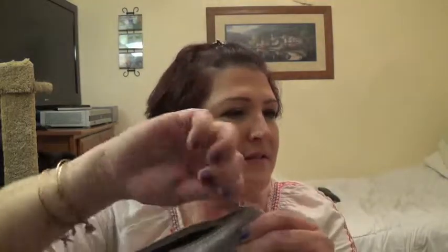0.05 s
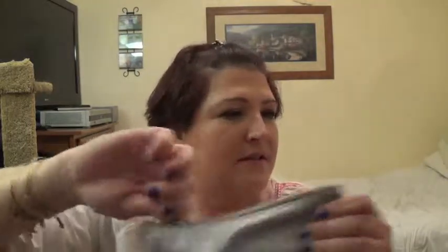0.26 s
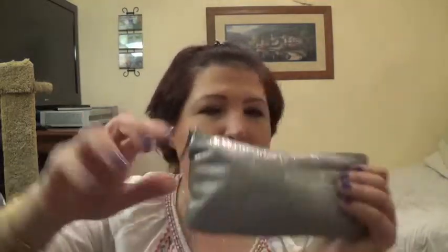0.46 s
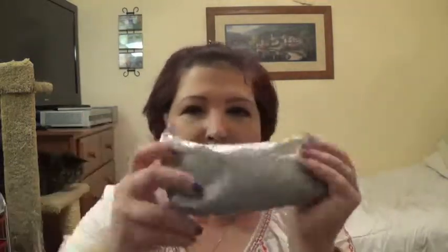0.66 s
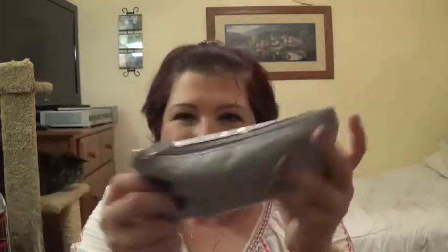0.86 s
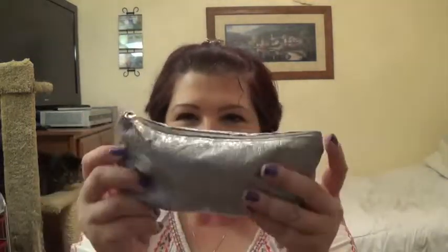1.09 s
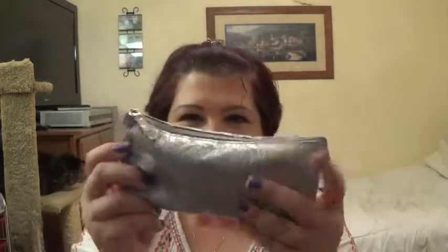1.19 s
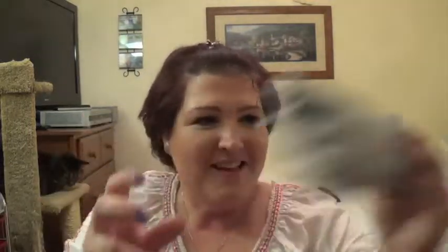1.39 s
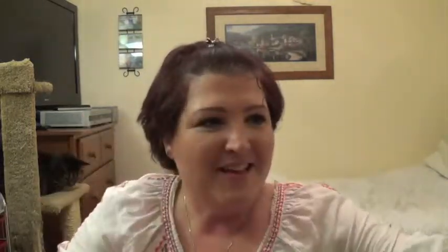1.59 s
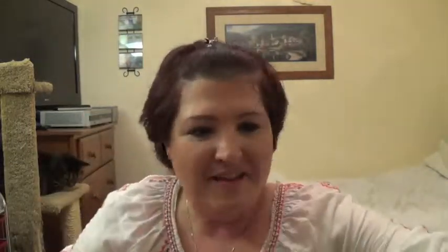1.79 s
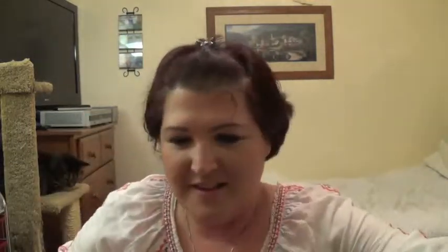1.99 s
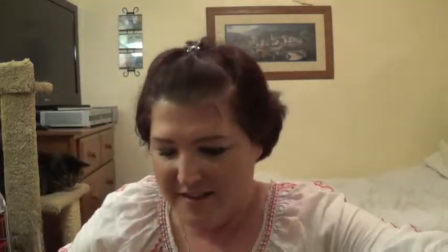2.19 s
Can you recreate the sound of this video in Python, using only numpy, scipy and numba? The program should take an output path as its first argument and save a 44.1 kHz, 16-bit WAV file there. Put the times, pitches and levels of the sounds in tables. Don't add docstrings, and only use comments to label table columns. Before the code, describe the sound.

A foil-like pouch gives a sharp snap at 0.1 s, then its zip buzzes shut from 0.17 to 0.42 s, rising in pitch. Bright crinkles and crackling pops follow from 0.6 to 1.25 s, with a stronger rustle as it is laid aside around 1.3-1.5 s. At 1.9 s a heavier item knocks and bounces on a wooden table, rattling loose things. Close, quiet room with faint hum and whine.

```python
import sys
import numpy as np
from scipy import signal
from scipy.fft import rfft, irfft
from scipy.io import wavfile
from scipy.ndimage import uniform_filter1d
from numba import njit

SR = 44100
rng = np.random.default_rng(int(sys.argv[2]) if len(sys.argv) > 2 else 0)


def invert_db(level):
    return 10 ** (np.asarray(level, dtype=float) / 20)


def store_wav(level_fs):
    pcm = np.round(np.clip(np.atleast_2d(level_fs), -1, 1) * 32767)
    wavfile.write(sys.argv[1], SR, pcm.T.astype(np.int16))


N = 99225
T = np.arange(N) / SR
WALL_TOP_HZ = 4270


def unit(x):
    return x / np.sqrt(np.mean(x ** 2))


def noise():
    return rng.standard_normal(N)


def colour(x, points):
    hz, db = np.array(points, float).T
    log_f = np.log(np.arange(1025) * SR / 2048 + 1)
    log_gain = np.interp(log_f, np.log(hz), db) * np.log(10) / 20
    cepstrum = irfft(log_gain)
    cepstrum = cepstrum * np.r_[1, 2 * np.ones(1023), 1, np.zeros(1023)]
    response = irfft(np.exp(rfft(cepstrum)))
    return unit(signal.fftconvolve(x, response)[:len(x)])


def band(x, lo_hz, hi_hz):
    sos = signal.butter(2, [lo_hz, min(hi_hz, .45 * SR)], "bandpass", fs=SR, output="sos")
    return signal.sosfilt(sos, x)


def walk(rate):
    k = int(SR / rate)
    steps = np.repeat(rng.standard_normal(N // k + 1), k)
    return 1.44 * uniform_filter1d(uniform_filter1d(steps, k), k)[:N]


@njit
def rings(start, hz, t60, size, n, sr):
    y = np.zeros(n)
    for k in range(len(start)):
        turn = np.exp(2j * np.pi * hz[k] / sr - np.log(1000) / (t60[k] * sr))
        z = size[k] + 0j
        for i in range(int(start[k] * sr), min(n, int((start[k] + t60[k]) * sr))):
            y[i] += z.imag
            z *= turn
    return y


def bursts(start, t60, size):
    total = 0
    for s, g in zip(start, size):
        age = np.maximum(T - s, 0)
        total = total + g * 1000. ** (-age / t60) * np.minimum(age / 0.0021, 1)
    return total


def room_tone():
    # (f/Hz, level/dB)
    air_colour = [(25, -5), (131, 1.5), (979, -5.5), (1510, -22), (3910, -16), (11000, -26), (15200, -8.5),
                  (16500, -7.5)]
    middle = colour(noise(), air_colour)
    side = 0.23 * band(colour(noise(), air_colour), 20, WALL_TOP_HZ / 2)
    air = invert_db(-55) * (middle + side * np.array([[1], [-1]]))
    fan_hz, fan_width_hz = 1660, 160
    fan = unit(band(noise(), fan_hz - fan_width_hz / 2, fan_hz + fan_width_hz / 2))
    fan = fan * invert_db(-59 + 2 * walk(9.25))
    hum = invert_db(-59.5 + 2 * walk(9.97)) * np.sin(2 * np.pi * 117.3 * T)
    whine = invert_db(-65) * np.sin(2 * np.pi * 15735 * T)
    rumble = 0
    for f, db in [(55, -60.5), (250, -57)]:
        rumble = rumble + unit(band(noise(), f * .6, f * 1.5)) * invert_db(db + 3 * walk(25))
    rumble = rumble * np.exp(-((T - 1.372) / 0.15) ** 4)
    return air + fan + hum + whine + rumble


def walls(x):
    t60_s, level_db, wide = 0.24, -15, 0.65
    t = T[:SR // 2]
    dull = signal.butter(1, [200, WALL_TOP_HZ], "bandpass", fs=SR, output="sos")
    echoes = rng.standard_normal((2, len(t))) * (t > .004) * 1000. ** (-t / t60_s)
    mid, side = signal.sosfilt(dull, echoes)
    side = wide * band(side, 100, WALL_TOP_HZ / 2)
    tails = np.array([mid + side, mid - side]) / np.sqrt(np.sum(mid ** 2))
    return invert_db(level_db) * signal.fftconvolve(x, tails, axes=1)[:, :N]


def phase_apart(x, lead, top_hz):
    both_ways = band(band(x, 150, top_hz)[::-1], 150, top_hz)[::-1]
    return x - lead * np.array([[1], [-1]]) * signal.hilbert(both_ways).imag


def drop():
    # (t/s, peak level/dB, clatter level/dB)
    knocks = [(1.8943, -9, 3.5), (1.8968, -5, -5), (1.9061, -10.5, 4), (1.913, -21, -8), (1.9245, -11, 3.5),
              (1.9305, -10, -11), (1.9435, -18, -4), (1.9567, -13.5, -5), (1.9725, -21, -4),
              (1.998, -23, -3.5), (2.038, -12, -6.5)]
    # (f/Hz, level/dB, t60/s)
    table_tones = [(101, -28, 0.09), (170, -13, 0.083), (240, -11, 0.025), (386, -1.5, 0.026),
                   (574, 4, 0.02), (775, 10, 0.023), (1010, 5, 0.025)]
    # (f/Hz, level/dB)
    clatter_colour = [(35, -38), (60, -5.5), (559, 1.5), (691, -5), (1130, -6), (7960, -17.5), (13000, -25),
                      (16500, -53)]
    s, db, bright_db = np.array(knocks, float).T
    u = rng.standard_normal((len(s), 2 * len(table_tones))).T
    wood = 0
    for k, (f, g, t60) in enumerate(table_tones):
        hz = f * (1 + 0.06 * u[2 * k])
        wood = wood + rings(s, hz, t60 + 0 * s, invert_db(db + g + 2.5 * u[2 * k + 1]), N, 1. * SR)
    clatter = colour(noise() * invert_db(1.3 * walk(180)), clatter_colour)
    clatter = clatter * bursts(s, 0.14, invert_db(db + bright_db))
    return invert_db(-21.5) * band(wood, 63, 3500) + invert_db(-14) * clatter


def crinkle():
    # (t/s, effort level/dB, body share/dB)
    grips = [
        [(0, -50, 0.5), (.14, -51, -12.5), (.17, -46, 5.5)],
        [(.41, -34, 7.5), (.45, -44.5, 3), (.55, -44.5, -14), (.61, -56.5, -13)],
        [(.618, -41.5, 1), (.636, -26.5, -10.5), (.67, -38.5, -3), (.71, -30.5, -6.5), (.76, -35, -4.5),
         (.8, -33, -8), (.85, -38, -9.5), (.9, -33.5, -6)],
        [(.95, -37, -9.5), (1.03, -35, -2.5), (1.11, -37.5, -42), (1.15, -45.5, -22), (1.24, -43, -9)],
        [(1.3, -35.5, -7.5), (1.35, -33, -8), (1.37, -27.5, 0), (1.43, -29, -8), (1.46, -40, -9),
         (1.53, -47, -1.5), (1.58, -41.5, -7.5), (1.63, -50, -7)],
        [(1.68, -42, -9.5), (1.75, -52.5, 1.5), (1.88, -40.5, -6)],
        [(2.0, -44, 4), (2.1, -53.5, 6), (2.175, -35.5, -6), (2.25, -46, -6.5)],
    ]
    # (f/Hz, level/dB)
    foil_colour = [(880, -36), (1500, -4), (2290, 5.5), (4010, 4), (10400, 9), (15200, -5), (16500, -84)]
    # (f/Hz, level/dB)
    body_colour = [(60, -15), (337, -2.5), (450, -6), (774, 2.5), (997, -3), (1430, 2), (3000, -6),
                   (6600, -120)]
    s, effort_db, body_db = np.vstack([np.array(g, float) for g in grips]).T
    pops_per_s, pop_spread_db = 700, 3.5
    u = rng.random((pops_per_s * 3, 4)).T
    start = np.cumsum(-np.log(u[0])) / pops_per_s
    size = invert_db(np.minimum(-pop_spread_db * np.log(u[3]), 8))
    hz = 11500 * 2 ** (-1.7 * u[1] ** 5)
    pops = unit(band(rings(start, hz, (6 + 10 * u[2]) / hz, size, N, 1. * SR), 1500, 14000))
    rub = colour(noise(), foil_colour) * invert_db(1.5 * walk(120))
    body = colour(noise() * invert_db(3 * walk(120)), body_colour)
    body = body * invert_db(-1 + np.interp(T, s, body_db))
    return invert_db(np.interp(T, s, effort_db)) * (invert_db(-2.5) * rub + invert_db(-5) * pops + body)


def snaps():
    # (t/s, peak level/dB, f/Hz)
    foil_flips = [
        (0.0044, -27.5, 2000),
        (0.0603, -23, 10500),
        (0.09, -29.5, 1470),
        (0.1086, -5.5, 14340),
        (0.178, -18, 1350),
        (0.4733, -15, 13200),
        (0.5664, -13, 10080),
        (0.6167, -19, 13200),
        (0.7122, -19, 1406),
        (1.021, -14.5, 660),
                  (0.636, -23, 10420), (0.6544, -12.5, 8790), (0.6786, -19, 9300), (0.6882, -9.5, 5050),
                     (0.701, -8, 4100), (0.7073, -13, 4400), (0.7134, -16, 4650), (0.7278, -16, 4700),
                     (0.7627, -25.5, 2090), (0.7746, -14, 8720), (0.7893, -12.5, 4860),
                     (0.7965, -13, 10800), (0.8046, -12, 9700), (0.8137, -21, 9600), (0.8326, -17, 8350),
                     (0.8392, -19.5, 10600), (0.8487, -20, 10100), (0.8603, -25, 10300),
                     (0.8698, -22.5, 1550), (0.894, -18, 10900), (0.9008, -14, 10000), (0.9096, -16, 3360),
                     (0.922, -12.5, 10200), (0.927, -18, 10400), (0.954, -19, 10100), (0.964, -16, 9200),
                     (0.9798, -22, 2000), (0.9962, -13, 9600), (1.0121, -17.5, 8900), (1.0216, -12.5, 9730),
                     (1.0264, -9.5, 4990), (1.0452, -19, 5940), (1.0489, -20, 8960), (1.055, -12.5, 8600),
                     (1.06, -15.5, 8300), (1.0672, -12.5, 1780), (1.0717, -17, 5050), (1.0863, -21, 10400),
                     (1.0968, -21, 10940), (1.1036, -14.5, 9400), (1.1109, -15.5, 10900),
                     (1.1264, -14, 9500), (1.133, -17.5, 9500), (1.141, -18, 9800), (1.15, -23, 9900),
                     (1.1658, -23.5, 2420), (1.1822, -25, 9910), (1.1961, -26, 2690), (1.2198, -24.5, 6720),
                     (1.228, -21, 8530), (1.2328, -18.5, 8700), (1.2482, -24, 6340),
                  (1.266, -24, 10250), (1.2878, -32, 9600), (1.3048, -23.5, 2070), (1.3099, -17, 10900),
                  (1.3203, -7, 10500), (1.33, -8, 3100), (1.3369, -8.5, 6770), (1.3394, -16, 6900),
                  (1.3623, -9, 3220), (1.368, -13, 5900), (1.3787, -9, 9900), (1.384, -5, 4290),
                  (1.394, -12, 9150), (1.4118, -8.5, 9100), (1.417, -17, 8700), (1.422, -9, 10400),
                  (1.4328, -12, 9870), (1.4368, -20, 2390), (1.4501, -18, 10200), (1.456, -17, 13350),
                  (1.4611, -18, 10770), (1.4699, -10.5, 11800), (1.4906, -15.5, 10000),
                  (1.5064, -22, 10300), (1.522, -20.5, 7860), (1.6282, -30, 2260), (1.6474, -23.5, 2280),
                  (1.6554, -21.5, 11000), (1.6665, -28.5, 2600), (1.6738, -20, 11900), (1.6911, -18, 2470),
                  (1.7838, -29, 2720), (1.7919, -25.5, 2840), (1.8353, -27, 10510), (1.853, -22.5, 1930),
                  (1.8754, -26, 9990),
                  (2.048, -18.5, 1150),
        (2.1553, -26.5, 2420),
        (2.1655, -18.5, 3100),
        (2.1697, -22.5, 3010),
        (2.1885, -17.5, 11100),
        (2.189, -22.5, 2430),
    ]
    s, db, hz = np.array(foil_flips, float).T
    size = invert_db(db - 14)
    u = rng.standard_normal((len(s), 30)).T
    low = 4000 / np.maximum(hz, 4000)
    long = invert_db(.35 * (db + 15)) * low ** .7
    ring_s, unfold_s, spread_octaves = .0045, .0016, .55
    spread = spread_octaves * np.minimum(low ** 1.1, (hz / 4000) ** .8)
    ring = 0
    for k in range(14):
        pitch = np.minimum(hz * 2 ** (spread * np.clip(u[k], -2, 2) * (k > 0)), 15800)
        start = s + unfold_s * long * np.abs(u[k + 14]) * (k > 3)
        ring = ring + rings(start, pitch, ring_s * long, size, N, 1. * SR)
    shell_hz = 1600 * (1 + 0.052 * u[29])
    shell = rings(s, shell_hz, 2 * ring_s * long, size * invert_db(-6) * low, N, 1. * SR)
    return band(band(ring + shell, 500, 15500), 500, 17000)


def zipper():
    # (t/s, teeth per second f/Hz, thump level/dB, overtone level/dB, scrape level/dB)
    pull = [(0.167, 272, -71, -58, -46.5), (.178, 297.8, -44, -38.5, -50), (.201, 365.4, -38.5, -56, -43),
            (.217, 400, -30, -34.5, -37.5), (0.246, 505.6, -36, -52, -32.5), (.285, 592.8, -27, -45, -35),
            (0.304, 824, -33, -27.5, -31), (0.32, 862, -28.5, -30.5, -26), (.367, 849.6, -19, -21.5, -34.5),
            (0.382, 786, -20, -22, -25.5), (0.39, 749, -21.5, -28.5, -29), (0.4, 797, -50, -22, -28),
            (0.415, 865, -33, -19.5, -52)]
    # (f/Hz, level/dB)
    scrape_colour = [(150, -28), (854, 0), (1240, -4.5), (1690, -18), (2060, -6), (10200, -10),
                     (16000, -27)]
    # (t/s, half length/s, f/Hz, level/dB)
    tab_rattle = [
        (0.196, .025, 1398, -42),
        (0.26, 0.05, 1086, -39.5),
    ]
    s, hz, first_db, second_db, scrape_db = np.array(pull, float).T

    def at(values):
        return np.interp(T, s, values)

    on = np.clip(np.minimum(T - s[0], s[-1] - T) / 0.0031, 0, 1)
    slow = np.clip(1 - at(hz) / 800, 0, 1) * 2
    unsteady = 1 + .012 * walk(400) + .035 * slow * walk(90)
    phase = 2 * np.pi * np.cumsum(at(hz) * unsteady) / SR

    def shake():
        return 1.5 * (1 + 1.5 * slow) * walk(150)

    tone = invert_db(at(first_db) + shake()) * np.sin(phase)
    tone = tone + invert_db(at(second_db) + shake()) * np.cos(2 * phase)
    for k in range(3, 7):
        tone = tone + invert_db(at(second_db) - 1.5 * k - 10 + 3 * shake()) * np.sin(k * phase + k * k)
    scrape = colour(noise() * (1 + .9 * np.cos(phase)), scrape_colour)
    scrape = band(scrape, 450, 16000)
    slider_hz = 1680
    slider = unit(band(scrape, 0.887 * slider_hz, 1.03 * slider_hz))
    tone = tone + invert_db(at(second_db) - 10) * slider
    tab = 0
    for mid, half, f, db in tab_rattle:
        swell = np.exp(-((T - mid) / half) ** 4)
        tab = tab + invert_db(db) * swell * unit(band(scrape, .96 * f, 1.04 * f))
    scrape = invert_db(at(scrape_db) + 2.5 * walk(61.7)) * scrape
    return band(on * (np.sqrt(2) * tone + tab + scrape), 200, 20000)


def scene():
    aside = np.clip((T - 1.45) / 0.17, 0, 1)
    rustle, pops, knocks = crinkle(), snaps(), drop()
    hands = phase_apart(rustle * (1 - aside), 0.095, 2000)
    hands = hands + phase_apart(pops * (1 - aside), 0.08, 14000)
    hands = hands + phase_apart((rustle + pops) * aside + knocks, 0.49, 7000)
    pan_db = -2 * np.array([aside, -aside]) / 2
    near = band(phase_apart(zipper(), 0.22, 2000) + hands * invert_db(pan_db), 60, 20000)
    return near + walls(near) + room_tone()


def band_limit(x):
    return signal.sosfilt(signal.butter(12, 16960, fs=SR, output="sos"), x)


def record(dry):
    top_cut = signal.ellip(8, .2, 45, 15900, fs=SR, output="sos")
    return band_limit(signal.sosfilt(top_cut, dry))


dry = scene()
out = record(dry)
store_wav(out)
```